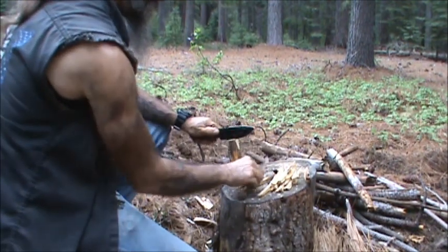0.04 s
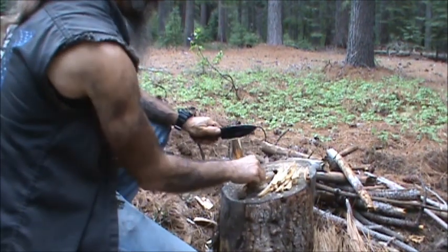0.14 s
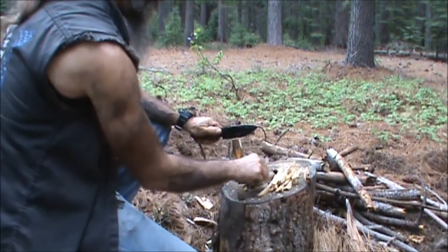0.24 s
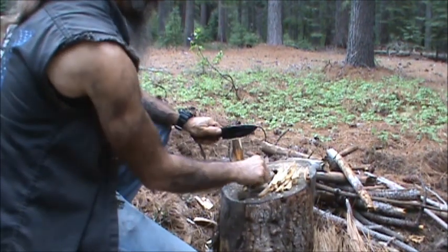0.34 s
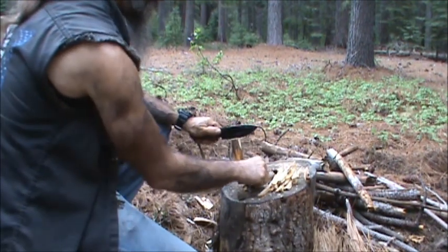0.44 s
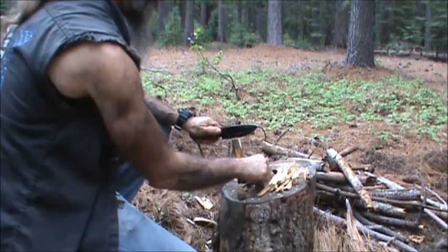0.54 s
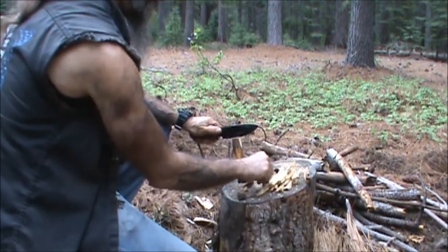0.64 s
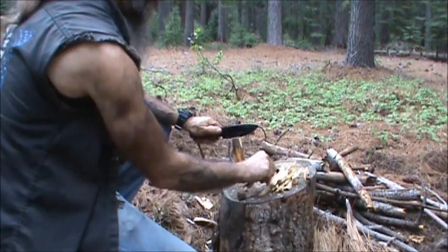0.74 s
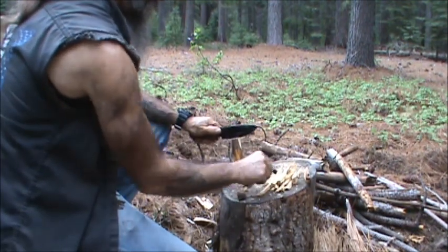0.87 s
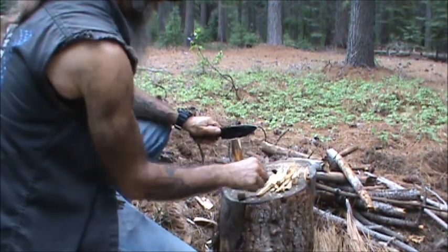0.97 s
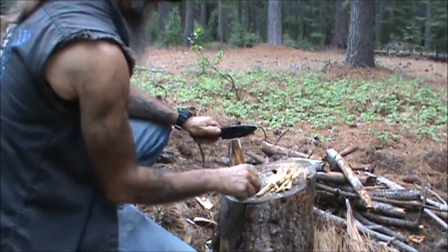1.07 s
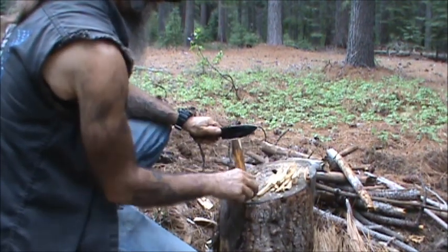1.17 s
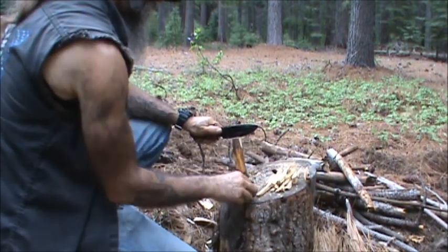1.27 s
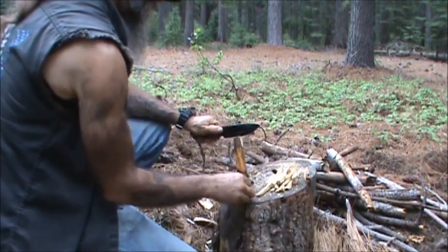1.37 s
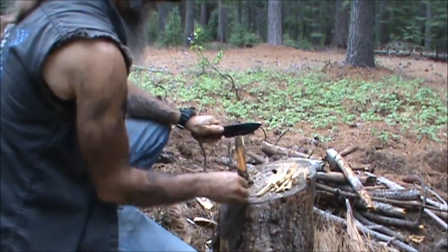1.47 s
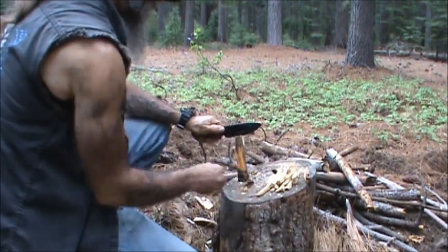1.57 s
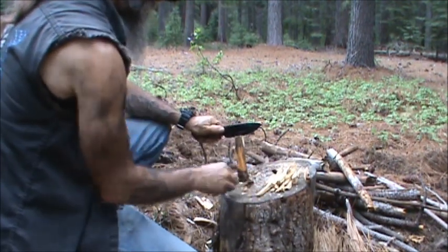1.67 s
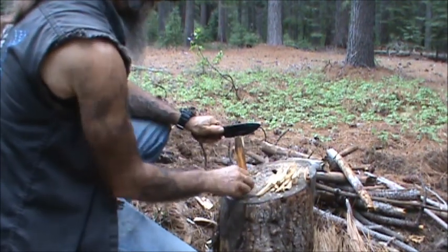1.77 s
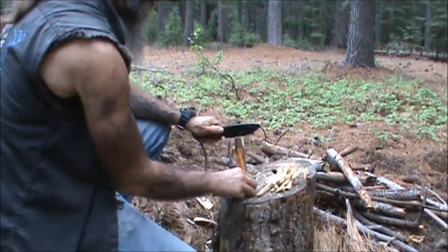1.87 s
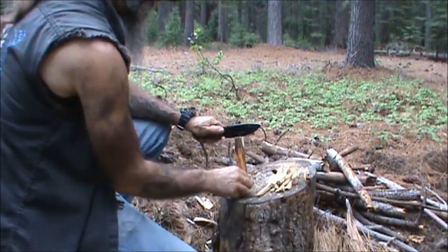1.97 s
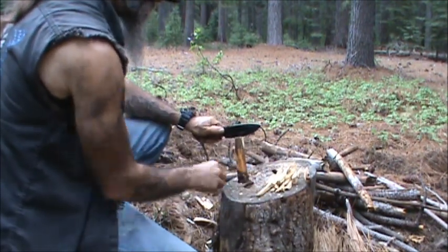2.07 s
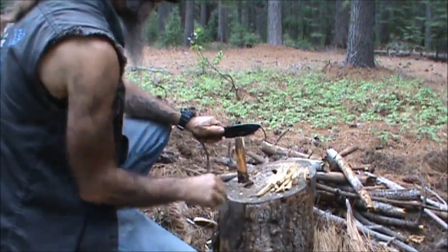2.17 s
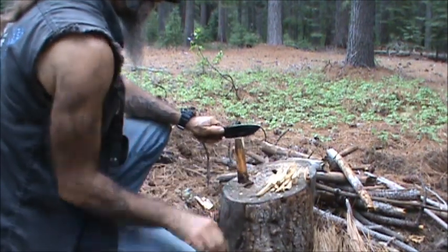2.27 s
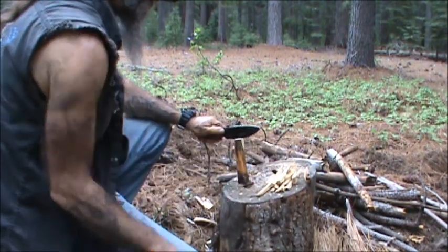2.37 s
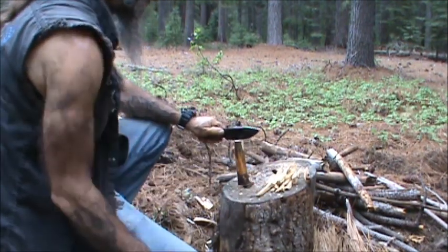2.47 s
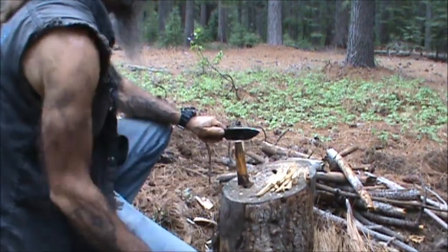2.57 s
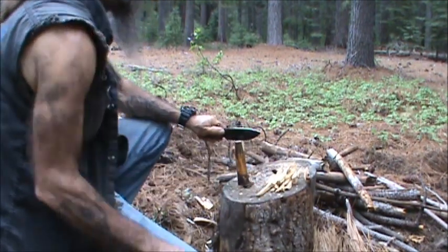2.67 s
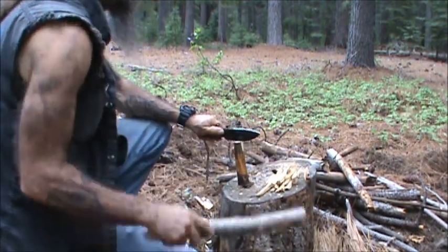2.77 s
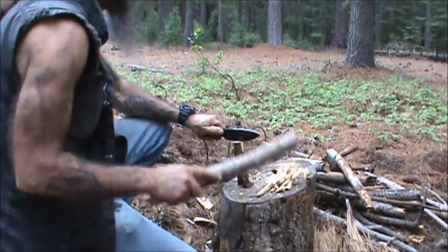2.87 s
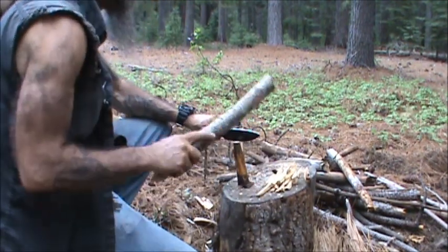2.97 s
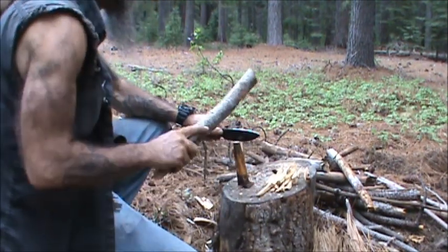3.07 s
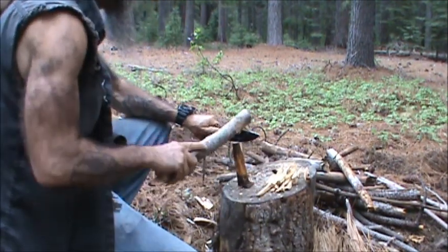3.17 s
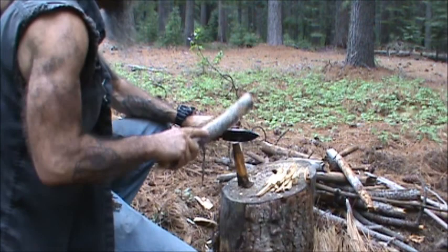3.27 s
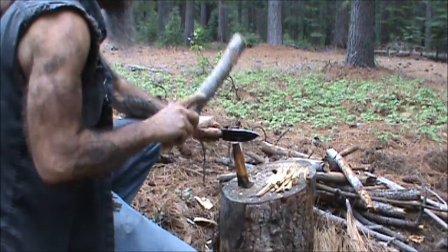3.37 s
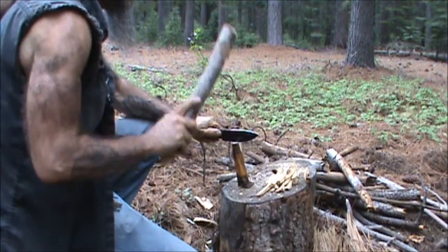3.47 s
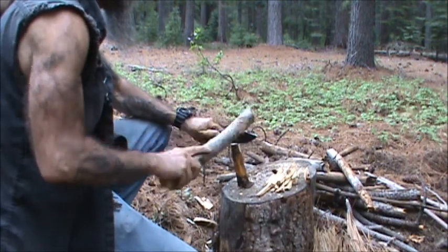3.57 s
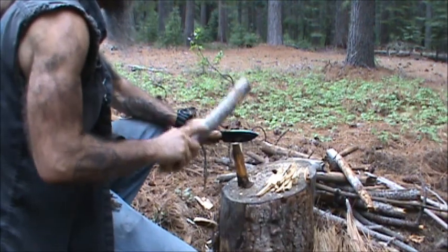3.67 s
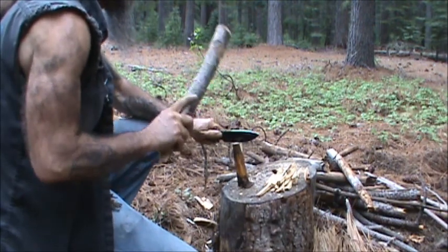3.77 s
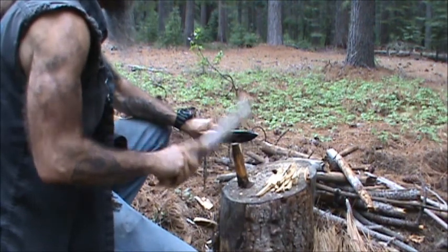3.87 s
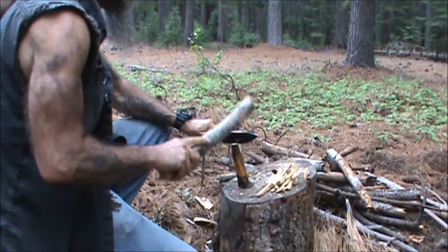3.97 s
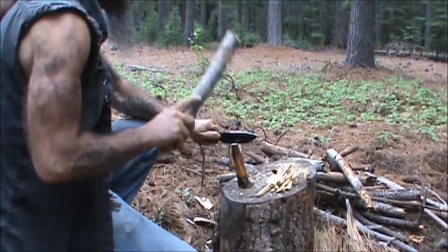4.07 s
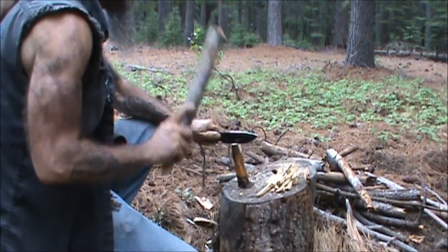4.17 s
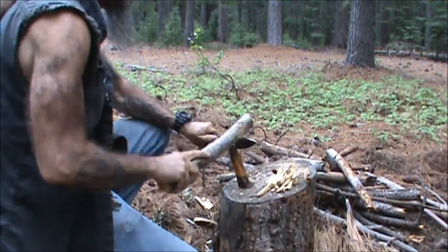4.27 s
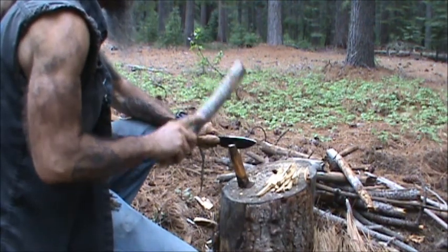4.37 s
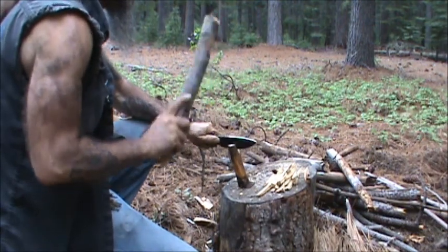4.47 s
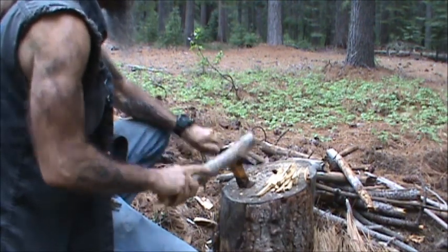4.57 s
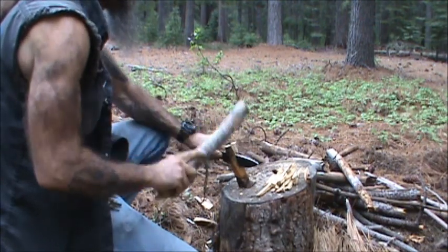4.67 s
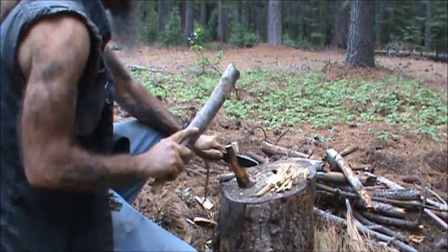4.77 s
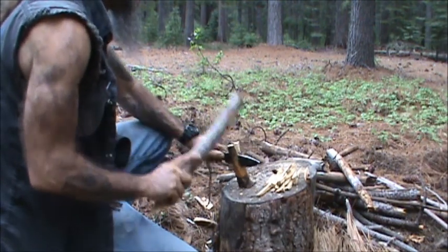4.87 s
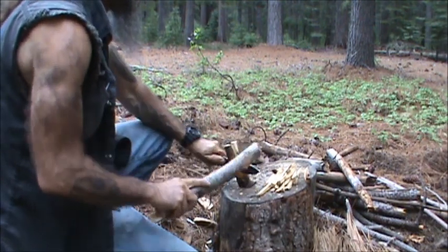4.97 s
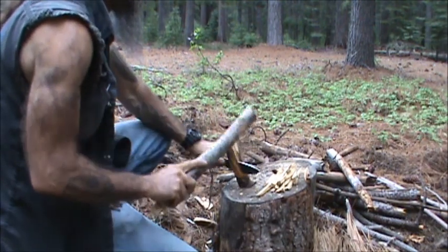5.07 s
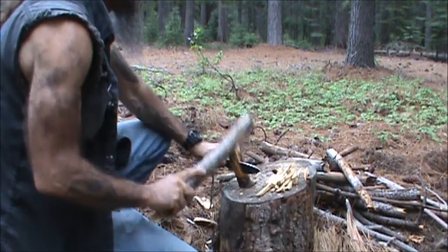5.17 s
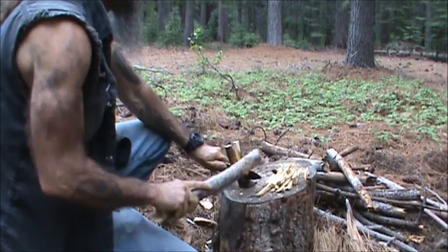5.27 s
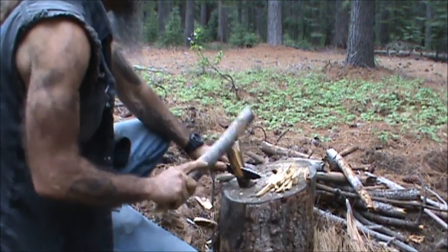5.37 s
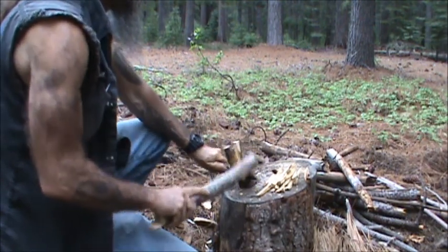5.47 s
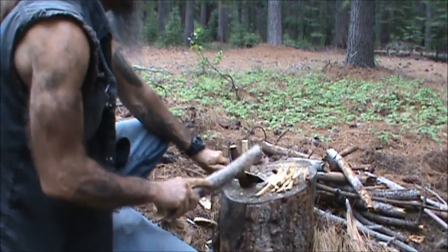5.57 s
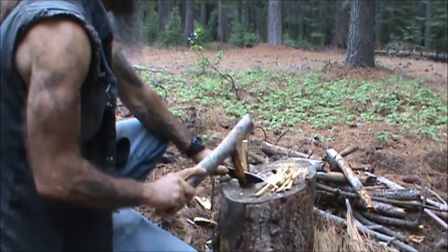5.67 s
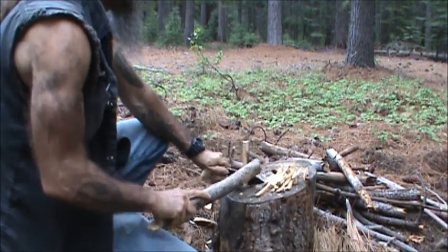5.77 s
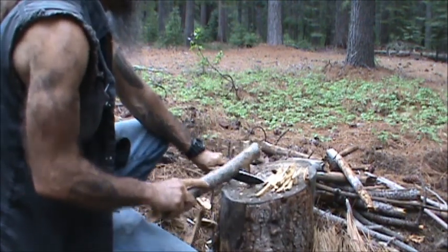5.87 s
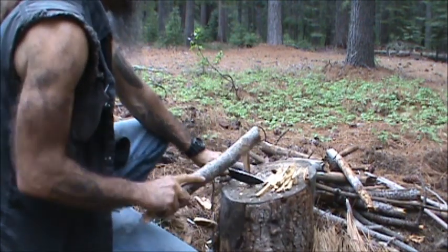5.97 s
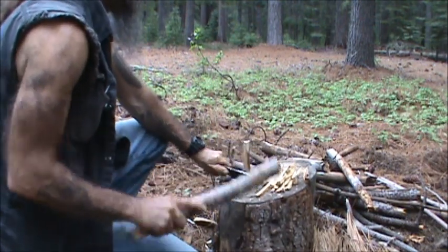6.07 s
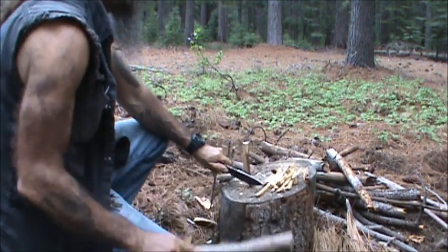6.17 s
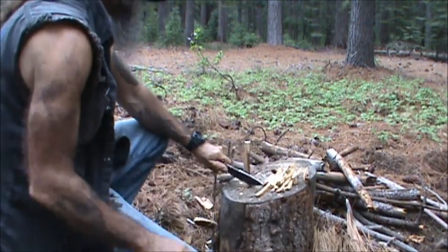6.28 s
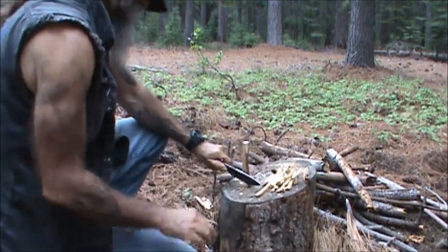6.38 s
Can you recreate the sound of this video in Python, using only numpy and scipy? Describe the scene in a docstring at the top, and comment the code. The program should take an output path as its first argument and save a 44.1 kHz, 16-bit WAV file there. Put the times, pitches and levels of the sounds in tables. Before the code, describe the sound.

Quiet outdoor air with soft hiss and a faint ticking, humming camera lens motor. A small tap and light rustle, then nine hard knocks of a stick on a knife blade, roughly three per second, each scattering briefly among the trees. The fifth and ninth carry a splitting crack. Finally the stick drops with a low woody thud. Close camera microphone, stereo.

```python
"""Quiet forest: a wooden baton drives a knife through a billet on a stump in nine sharp knocks.
Knocks sum ringing modes, noise bursts and a stop pulse; tree trunks scatter them back as decaying noise.
The billet cracks on the fifth and ninth. Thuds, clicks and rustling needles are shaped noise; the dropped baton rings.
Early on a camera's lens motor ticks and hums over hiss and a thin whine; a gain control ducks under the blows."""
import sys
import numpy as np
from scipy import signal
from scipy.fft import rfft, irfft, next_fast_len
from scipy.io import wavfile
from scipy.ndimage import uniform_filter1d

SR = 44100
rng = np.random.default_rng(int(sys.argv[2]) if len(sys.argv) > 2 else 0)


def generate_wav(sig):
    """Save sig (samples, or channels by samples) to the path in sys.argv[1] as 16-bit PCM at SR."""
    pcm = np.round(np.clip(np.atleast_2d(sig).T, -1, 1) * 32767).astype(np.int16)
    wavfile.write(sys.argv[1], SR, pcm)


N = 283239
TIME = np.arange(N) / SR
AGE = TIME[:SR // 3]  # time since a blow [s]
STEREO = np.array([[1], [-1]])  # side signal: left plus, right minus


def undb(db):
    """Decibels to gain."""
    return 10 ** (np.asarray(db) / 20)


def unit(x):
    """Scale to rms 1."""
    return x / np.sqrt(np.mean(x ** 2))


def punch(x):
    """Scale a hit to the energy of 12 ms at rms 1."""
    return x / np.sqrt(np.mean(x ** 2) * x.shape[-1] / (0.012 * SR))


def add(out, start_s, x):
    """Mix x into out from start_s on."""
    i = int(start_s * SR)
    out[:, i:i + x.shape[-1]] += x[..., :N - i]


def band(x, low_hz, high_hz):
    """Causal band-pass."""
    edges_hz = [low_hz, min(high_hz, 0.45 * SR)]
    return signal.sosfilt(signal.butter(3, edges_hz, "band", fs=SR, output="sos"), x)


def colour(x, points):
    """Shape x by a spectrum of (frequency [Hz], level [dB]) points, joined on a log-frequency axis."""
    hz, db = np.transpose(points)
    size = next_fast_len(x.shape[-1])
    bins_hz = np.maximum(np.arange(size // 2 + 1) * SR / size, 1)
    gain = undb(np.interp(np.log(bins_hz), np.log(hz), db))
    return irfft(rfft(x, size) * gain, size)[..., :x.shape[-1]]


def fade(t, t60_s):
    """Exponential decay, 60 dB down after t60_s."""
    return np.exp(-np.log(1000) * t / t60_s)


def ring(modes, tuning=1):
    """Struck modes: decaying sines."""
    out = 0
    for hz, db, t60_s in modes:
        out = out + undb(db) * fade(AGE, t60_s) * np.sin(2 * np.pi * hz * tuning * AGE)
    return out


def burst(low_hz, high_hz, t60_s, width, chatter_db=0):
    """A crowd of weak modes: decaying noise in a band, grainy when the contact chatters."""
    steps = np.repeat(rng.standard_normal(len(AGE) // 12 + 1), 12)[:len(AGE)]  # 12-sample grains
    noise = rng.standard_normal((2, len(AGE))) * undb(chatter_db * steps) * fade(AGE, t60_s)
    mid, side = band(noise, low_hz, high_hz)
    return punch(mid + width * STEREO * side)


# air and hiss spectrum: (frequency [Hz], relative density [dB per Hz])
AIR_SPECTRUM = [(15, -33), (25, -3.5), (70, 0.5), (228, -11.5), (269, -10), (654, -9), (729, -5.5),
                (834, -7.5), (1120, -7), (1360, -9), (1870, -10.5), (2030, -8.5), (2390, -12.5),
                (3880, -13), (15800, -15)]
# stereo width of the air: (frequency [Hz], side minus mid [dB])
AIR_SIDE = [(60, -32), (110, -10.5), (200, -2), (380, 3.5), (700, 2), (1290, 3), (2380, 4.5), (4400, 1),
            (8120, -3.5), (15000, -20.5)]


def air(hiss_db=-53.5, whine_db=-78):
    """Wide coloured noise for forest air and camera hiss; a steady high sine for the camera's whine."""
    mid, side = colour(rng.standard_normal((2, N)), AIR_SPECTRUM)
    hiss = (mid + STEREO * colour(side, AIR_SIDE)) / np.std(mid)
    whine = np.sqrt(2) * np.sin(2 * np.pi * 15734 * TIME)
    return undb(hiss_db) * hiss + undb(whine_db) * whine


# resonances of the lens barrel: (frequency [Hz], relative level [dB], t60 [s])
BARREL_MODES = [(2300, 3.5, 0.0045), (2920, -4, .018), (3300, 1, 0.012), (3850, -5, 0.0059),
                (4720, -4.5, 0.033)]
# longer motor moves that hum: (start [s], length [s], relative level [dB])
LENS_RUNS = [(0.367, 0.054, -57), (0.499, 0.25, -59), (0.937, 0.1, -59), (1.137, 0.068, -58.5),
             (1.277, 0.066, -57.5), (1.37, 0.32, -59.5)]


def lens_motor(step_hz=30.17, hum_hz=1168, rattle=0.098, rattle_decay_cycles=0.47, tick_db=-58, hum_db=7):
    """Motor jerks and rattle, at the step rate, ring the lens barrel; longer moves hum between jerks."""
    cycle, phase = np.divmod(TIME * step_hz, 1)
    jerks = np.diff(cycle, prepend=0) * undb(2.5 * rng.standard_normal(N))
    drive = jerks + rattle * rng.standard_normal(N) * np.exp(-phase / rattle_decay_cycles)
    ticks = unit(signal.fftconvolve(drive, ring(BARREL_MODES))[:N]) * undb(tick_db)
    ticks = ticks * (TIME > 0.368) * (TIME < 1.67)  # motor on, before gear slack
    moves = sum(undb(db) * (TIME > start) * (TIME < start + length) for start, length, db in LENS_RUNS)
    moving = uniform_filter1d(moves, size=200)
    phase_jump_rad = 0.5 * rng.standard_normal(N)[cycle.astype(int)]  # new at each step
    hum = np.sin(2 * np.pi * hum_hz * TIME + phase_jump_rad) * np.sin(np.pi * phase) ** 2
    slack = int(0.0032 * SR)  # gears take up their play first
    return np.roll(ticks, slack) + undb(hum_db) * moving * hum


# dull bumps of wood on stump and soil, and under the first blow: (time [s], relative level [dB], wood clack
# minus thump [dB])
THUDS = [(1.739, -54.5, 2.5), (2.46, -65.5, 7), (3.177, -47, 6), (5.915, -30.5, -9), (5.949, -48, 1),
         (6.268, -47.5, -1), (6.32, -38, 1)]
THUMP_HZ, THUMP_T60_S, CLACK_HZ, CLACK_T60_S = 180, 0.053, 480, 0.033


def thuds(out):
    """Dull bumps: a low thump and a higher clack, each a decaying noise band; the one at 3.177 s dulls the
    first blow."""
    for start_s, db, clack_db in THUDS:
        for hz, t60_s, part_db in (THUMP_HZ, THUMP_T60_S, 0), (CLACK_HZ, CLACK_T60_S, clack_db):
            add(out, start_s, undb(db + part_db) * burst(hz / 1.38, hz * 1.4, t60_s, 0.064))


# small clicks and snaps: (time [s], relative level [dB], band centre [Hz])
SNAPS = [(0.372, -37.5, 2800), (.505, -36.5, 3500), (0.712, -30, 10000), (0.984, -39.5, 3980),
         (1.69, -37, 2600), (2.398, -33.5, 5000), (2.461, -40.5, 1900), (2.653, -41.5, 6040),
         (4.94, -25, 8000), (6.193, -35, 4200), (6.245, -32.5, 4000), (6.409, -39.5, 5650)]


def snaps(out, level_db=-11.5):
    """Small clicks and snaps: short noise bursts about two octaves wide."""
    for start_s, db, hz in SNAPS:
        add(out, start_s, undb(db + level_db) * burst(hz / 2, hz * 1.94, 0.022, 0.37))


# dry needles disturbed: (time [s], length [s], relative level [dB])
RUSTLES = [(2.394, 0.071, -45.5), (2.495, 0.5, -58), (2.739, 0.053, -48.5), (5.902, 0.031, -46.5),
           (6.187, 0.033, -43), (6.201, 0.12, -49), (6.254, 0.032, -35)]
# needle crackle spectrum: (frequency [Hz], relative level [dB])
NEEDLE_SPECTRUM = [(300, -31), (1500, -4), (3000, -1.5), (4000, 1), (5400, -7.5), (7600, 1), (10000, -4.5),
                   (15500, -12.5)]


def rustles(out, grain_db=1.5):
    """Dry needles crackle: uneven noise grains, coloured, swelling and falling as a half sine."""
    for start_s, length_s, db in RUSTLES:
        size = int(length_s * SR)
        grains = rng.standard_normal((2, size)) * undb(grain_db * rng.exponential(size=size))
        mid, side = unit(colour(grains, NEEDLE_SPECTRUM))
        swell = np.sin(np.linspace(0, np.pi, size))
        add(out, start_s, undb(db) * swell * (mid + 0.13 * STEREO * side))


# the baton out of the hand: (frequency [Hz], relative level [dB], t60 [s])
FREE_BATON_MODES = [(145.6, -40.5, 0.17), (925, -35, 0.18), (1950, -52, .067)]


def dropped_baton(out, drop_s=6.319, drop_db=2):
    """The baton, free of the hand, rings on in its own modes."""
    add(out, drop_s, undb(drop_db) * ring(FREE_BATON_MODES))


def handling():
    """Small sounds around the knocks: thuds, clicks and snaps, rustles and the dropped baton."""
    out = np.zeros((2, N))
    thuds(out)
    snaps(out)
    rustles(out)
    dropped_baton(out)
    return out


# sounding parts: stump, baton, lower blade, upper blade, billet, contact crack
# (low edge [Hz], high edge [Hz], lag [s], weak-mode noise t60 [s], noise minus modes [dB])
PARTS = [(114.5, 420, .0001, 0.038, -3.5), (591, 1130, 0.00034, 0.0221, -7),
         (1070, 2225, .0001, 0.026, 0.5), (1980, 2670, 0.00041, 0.031, -17.5),
         (2800, 4730, 0.00054, 0.015, 2.5), (4830, 13500, 0.00121, 0.018, -2)]
# same parts; the stump thumps less and the wedged steel rings more as the blade sinks
# (level at first bite [dB], change when through [dB], exponent of depth [1], share of free ring [1])
SINKING = [(-29.5, -12.5, 0.32, 0.15), (-15.5, -4, 0.76, 0), (-23, 5.5, 2.4, 0), (-18.5, 1.5, 1.1, 0.95),
           (-23.5, -1.4, 0.47, 0), (-23.5, -1.3, 1.1, 0.067)]
SOFT_ABOVE_HZ = 1660  # softness dulls parts above this


def part_levels(force_db, softness, ring_db, depth):
    """Part levels [dB] from force, contact softness, blade ring and blade depth (0-1)."""
    levels_db = []
    for (low_hz, high_hz, *_), (db, sink_db, power, share) in zip(PARTS, SINKING):
        octaves = max(np.log2(np.sqrt(low_hz * high_hz) / SOFT_ABOVE_HZ), 0)
        level_db = force_db + db + sink_db * depth ** power
        levels_db.append(level_db + share * ring_db - softness * octaves)
    return levels_db


# colour of the scattered sound: (frequency [Hz], relative level [dB])
FOREST_SPECTRUM = [(150, -3.5), (480, -14), (750, -3.5), (910, 3.5), (1100, 0.5), (1500, 6), (2050, 3),
                   (2330, 4), (2700, 0), (4000, 2), (5600, 3.5), (8000, 4), (14000, -9.5)]


def forest(levels_db, near_db=15.5, near_t60_s=0.058, far_t60_s=0.75, treble_t60_s=0.47,
           near_build_s=0.00556, far_build_s=0.046, patchy_db=2, width=0.56):
    """Trunk after trunk scatters the blow back: a noise wash, its treble dying first."""
    t = TIME[:SR]
    mid, side = rng.standard_normal((2, SR))
    patches = unit(uniform_filter1d(rng.standard_normal(SR), size=150))
    noise = (mid + width * STEREO * side) * undb(patchy_db * patches)
    blow_spectrum = []
    for db, (low_hz, high_hz, *_) in zip(levels_db, PARTS):
        density_db = db - 10 * np.log10((high_hz - low_hz) / (SR / 2))  # energy spread over its band
        blow_spectrum.append((np.sqrt(low_hz * high_hz), density_db))
    wash = colour(colour(noise, blow_spectrum), FOREST_SPECTRUM)
    lows = colour(wash, [(2500, 0), (5000, -6), (10000, -24)])
    far = lows * fade(t, far_t60_s) + (wash - lows) * fade(t, treble_t60_s)
    near = undb(near_db) * wash * fade(t, near_t60_s)
    return far * np.clip(t / far_build_s, 0, 1) + near * np.clip(t / near_build_s, 0, 1)


# the billet gives way, its crack hangs among the trees:
# (time [s], relative level [dB], low edge [Hz], high edge [Hz], t60 [s])
SPLITS = [(4.575, -30.5, 3130, 4100, 0.89), (5.745, -37, 2200, 2400, .9)]


def splits(out):
    """Splitting wood: narrow, wide-stereo noise bursts, faded out at the end of AGE."""
    for start_s, db, low_hz, high_hz, t60_s in SPLITS:
        end_fade = np.clip((AGE[-1] - AGE) / 0.024, 0, 1)
        add(out, start_s, undb(db) * burst(low_hz, high_hz, t60_s, 0.71) * end_fade)


def stop(stretch, hz=1750, length_s=0.00051, lag_s=0.00066):
    """The baton's sudden stop on the spine: one short pressure wave, slowed by stretch."""
    t = AGE / stretch - lag_s
    return -np.sin(2 * np.pi * hz * t) * np.exp(-(t / length_s) ** 2)


# baton, knife, billet and stump pressed together, before detuning and wedging:
# (frequency [Hz], relative level [dB], t60 [s])
PRESSED_MODES = [(156, -5.5, 0.088), (230.5, 12, 0.032), (383, 2, 0.054), (756, -9, 0.029),
                 (921.4, 0, 0.03), (1460, -9, 0.014), (1710, 4, 0.014), (1794, 3.5, 0.042),
                 (2232, -13.5, 0.016), (2369, -7.5, 0.018), (2910, -8, 0.027), (3556, -6, 0.038),
                 (4490, -20.5, 0.029), (4490, -4.5, 0.025), (5490, 1, 0.022), (7240, 8, 0.014),
                 (7500, -8.5, 0.036), (7820, 10.5, 0.013), (8640, 2.5, 0.023), (10270, -14, 0.017),
                 (10200, -5, 0.02), (12900, -13.5, 0.023), (13660, -11, 0.0144), (14700, -6, .014)]


def knock(levels_db, blade_tuning, wedge, scatter=0.009, width=0.19, chatter_db=6, bite_s=0.00072):
    """One blow: each part rings in its own modes, slightly detuned at random, plus a noise crowd."""
    out = 0
    for part, (db, (low_hz, high_hz, lag_s, t60_s, crowd_db)) in enumerate(zip(levels_db, PARTS)):
        tuning = blade_tuning if part == 3 else 1  # upper blade only
        hold = wedge if part >= 2 else 1  # not stump or baton
        tone, sign = 0, 1
        for hz, mode_db, mode_t60_s in PRESSED_MODES:
            if low_hz < hz < high_hz:
                mode = (hz * (1 + scatter * rng.standard_normal()), mode_db, mode_t60_s * hold)
                tone = tone + sign * ring([mode], tuning)
                sign = -sign  # neighbours swing oppositely: ring builds over a few cycles
        no_bass = signal.butter(2, low_hz * 0.93, "high", fs=SR, output="sos")
        tone = signal.sosfilt(no_bass, tone)  # each part keeps to its own band, nothing below it
        # short waves differ more between the two channels
        crowd = burst(low_hz, high_hz, t60_s, width * np.sqrt(low_hz / 1500), chatter_db)
        sound = punch((punch(tone) + undb(crowd_db) * crowd) * np.clip(AGE / bite_s, 0, 1))
        delayed = np.pad(sound, ((0, 0), (int(lag_s * SR), 0)))[:, :len(AGE)]
        out = out + undb(db) * delayed
    return band(out, 80, 18000)


# blows, weak touches and the uneven last split:
# (time [s], force [dB], contact softness [dB per octave], free ring of the blade [dB])
KNOCKS = [(1.737, -39.5, -3, -1.5), (3.1776, 4, 9.5, -8), (3.555, 2, 0, -3.5), (3.892, -2, -0.5, 1.5),
          (4.2339, -2, 0.04, 5), (4.5677, -1, -0.5, 4), (4.9245, 1.5, 0.5, -3), (5.2157, 0.5, 0, -1.2),
          (5.4864, 0.7, -1, -0.5), (5.7206, -9, 3.5, -3), (5.7276, -13, 2, -3.5), (5.7393, 0, 1.03, 4),
          (5.7656, -19.5, 9, 11), (5.948, -31.5, -1, -5), (6.318, -14.5, -4, -10.5)]
# ground and nearest trunks answer singly: (delay [s], level before echo strength [dB])
REFLECTIONS = [(.0068, -23.5), (0.0154, -24), (0.0266, -24)]
BITE_S, THROUGH_S = 3.88, 5.5  # blade sinks steadily between
BLADE_TUNING, TUNING_RISE = 0.957, 0.054  # pitch ratio at first bite; rise as the wood grips
WEDGE_GROWTH, SOFT_DAMPING_DB = 0.049, 0.42  # ring time: gain at full depth; loss per softness
PUSH_PER_SOFTNESS = 0.053  # a soft contact stops the baton more slowly
# echo strength after a blow: base [dB], change per dB of ring, per softness, at full depth
ECHO_DB, ECHO_PER_RING, ECHO_PER_SOFTNESS, ECHO_SINK_DB = -18, 0.62, 1, -1.25


def batoning(direct_db=3.5, forest_db=-4, stop_db=11):
    """Baton on blade: knocks, their first reflections, the forest's answer and the splits."""
    out = np.zeros((2, N))
    for start_s, force_db, softness, ring_db in KNOCKS:
        depth = np.clip((start_s - BITE_S) / (THROUGH_S - BITE_S), 0, 1)
        levels_db = part_levels(force_db, softness, ring_db, depth)
        spine_db = levels_db[2]  # lower blade
        blade_tuning = BLADE_TUNING + TUNING_RISE * depth
        wedge = (1 + WEDGE_GROWTH * depth) * undb(-SOFT_DAMPING_DB * softness)
        pulse = undb(spine_db + stop_db) * stop(1 + PUSH_PER_SOFTNESS * max(softness, 0))
        blow = undb(direct_db) * (knock(levels_db, blade_tuning, wedge) + pulse)
        add(out, start_s, blow)
        echo_db = ECHO_DB + ECHO_PER_RING * ring_db - ECHO_PER_SOFTNESS * softness + ECHO_SINK_DB * depth
        add(out, start_s, undb(echo_db + forest_db) * forest(levels_db))
        for delay_s, db in REFLECTIONS:
            # reflections follow half the echo strength
            reflection = undb(db + (echo_db + 13) / 2) * band(blow, 382, 4600)
            add(out, start_s + delay_s, reflection)
    splits(out)
    return out


def scene():
    """Knocks and handling slightly left, over the lens motor and air."""
    pan = undb(STEREO * 0.25)
    return (batoning() + handling()) * pan + lens_motor() + air()


def record(dry, threshold=0.23, slope=0.25, release_s_per_neper=2.8, ceiling=1.14, top_hz=16000):
    """Gain drops at once on peaks over threshold, recovers slowly; peaks are rounded, the top is cut."""
    over = np.log(np.abs(dry).max(axis=0) / threshold + 1e-9)
    release = TIME / release_s_per_neper
    held = np.maximum.accumulate(over + release) - release
    ducked = dry * np.exp(-slope * np.maximum(held, 0))
    rounded = ceiling * np.tanh(ducked / ceiling)
    return signal.sosfilt(signal.ellip(10, 0.2, 70, top_hz, fs=SR, output="sos"), rounded)


dry = scene()
out = record(dry)
generate_wav(out)
```